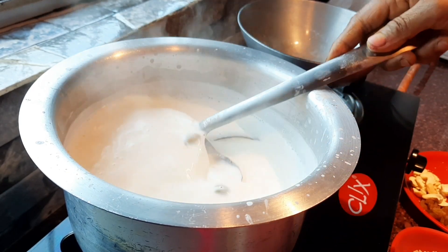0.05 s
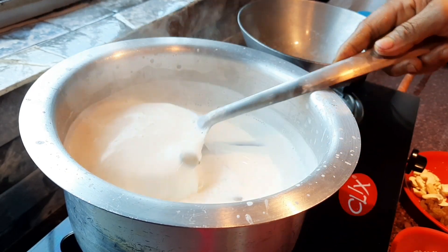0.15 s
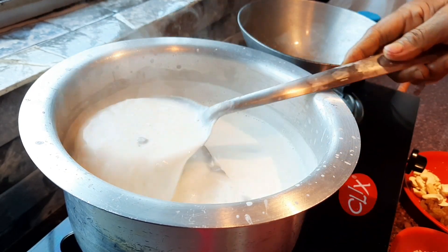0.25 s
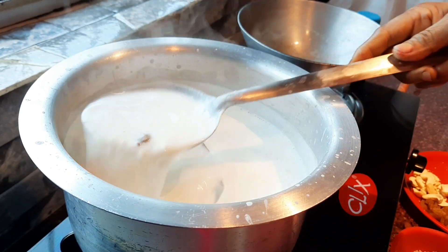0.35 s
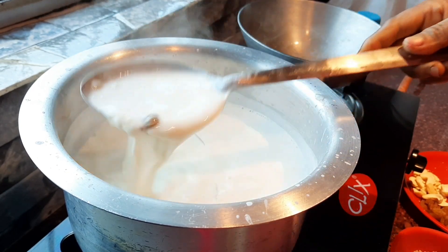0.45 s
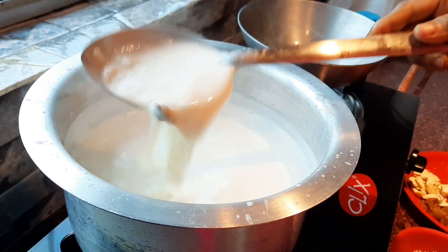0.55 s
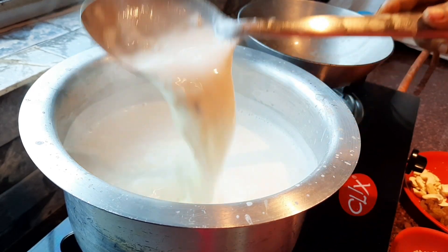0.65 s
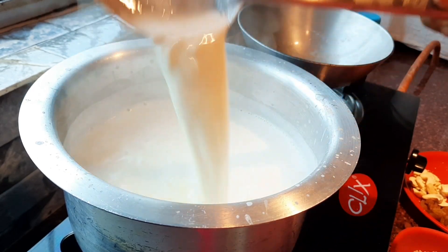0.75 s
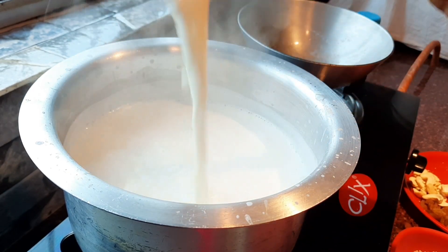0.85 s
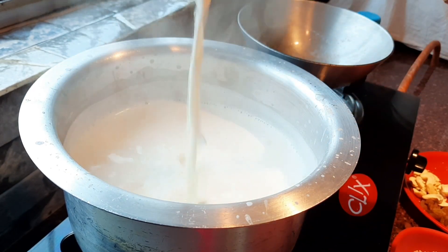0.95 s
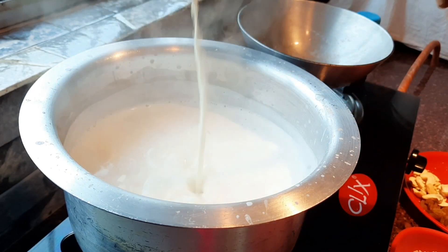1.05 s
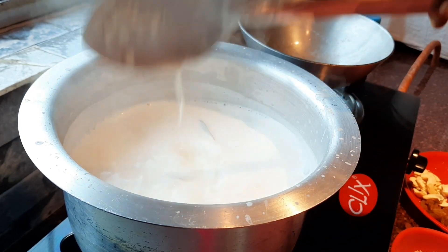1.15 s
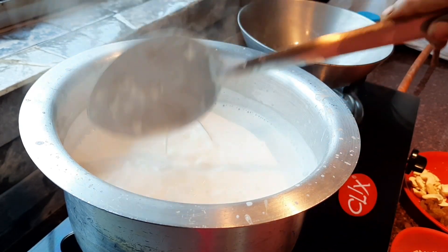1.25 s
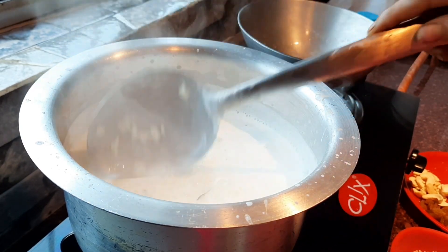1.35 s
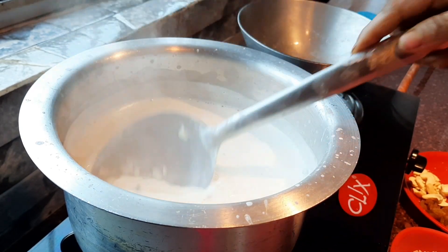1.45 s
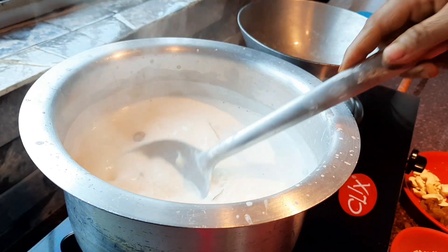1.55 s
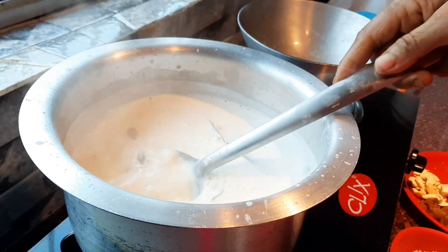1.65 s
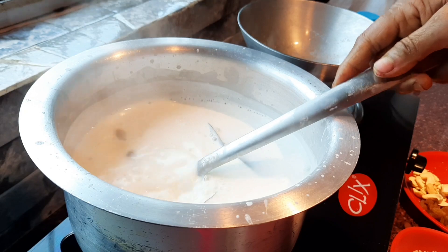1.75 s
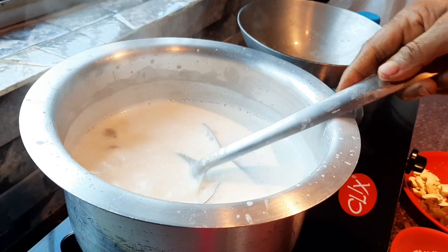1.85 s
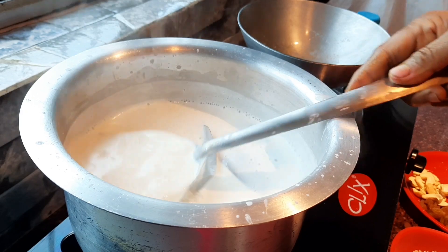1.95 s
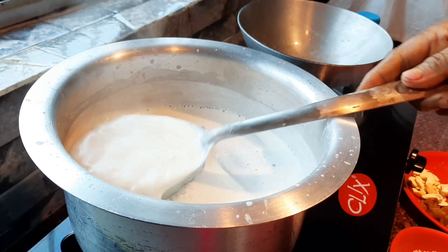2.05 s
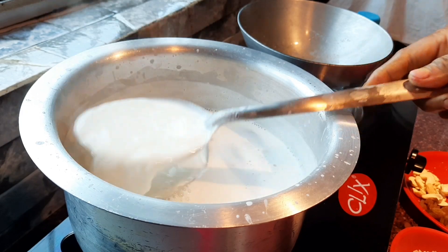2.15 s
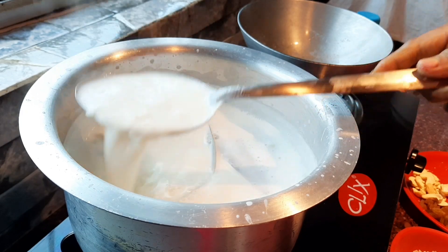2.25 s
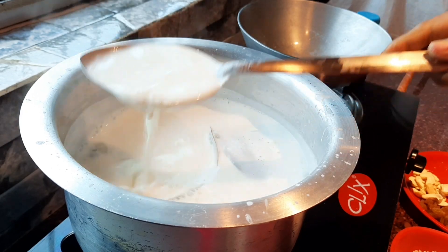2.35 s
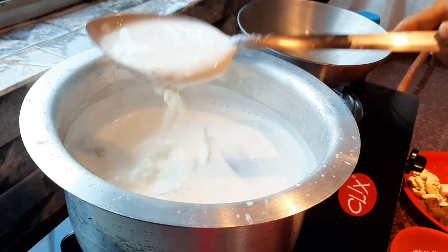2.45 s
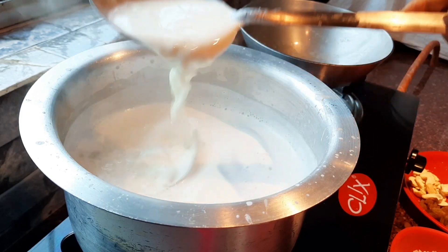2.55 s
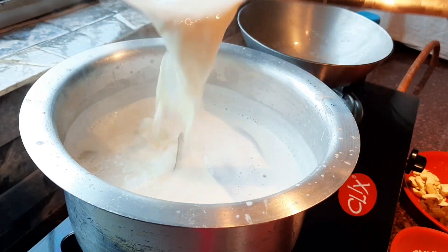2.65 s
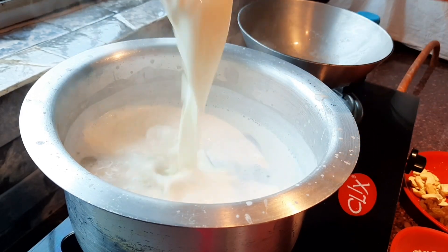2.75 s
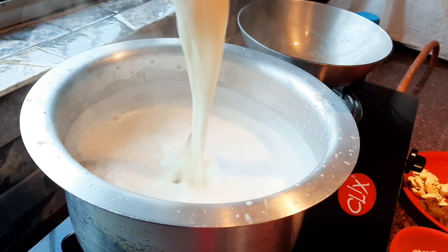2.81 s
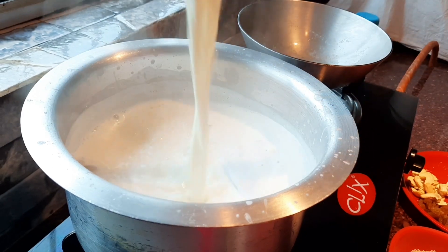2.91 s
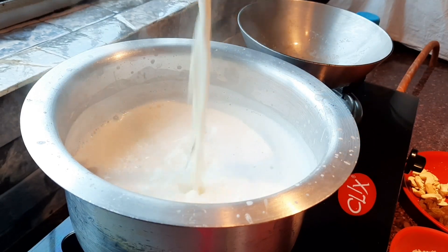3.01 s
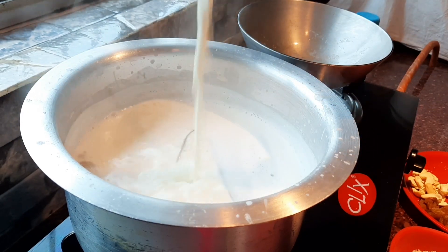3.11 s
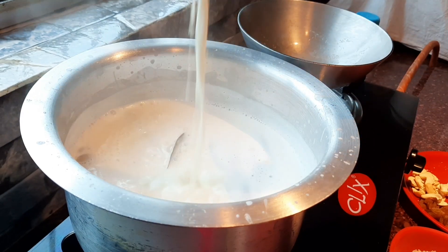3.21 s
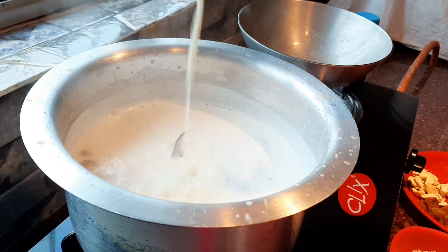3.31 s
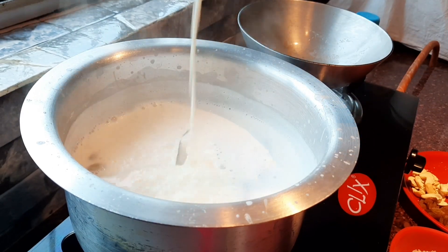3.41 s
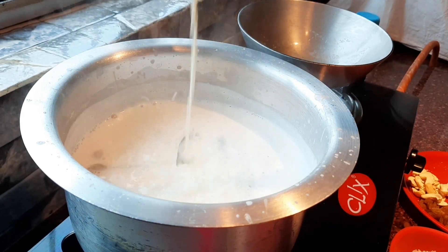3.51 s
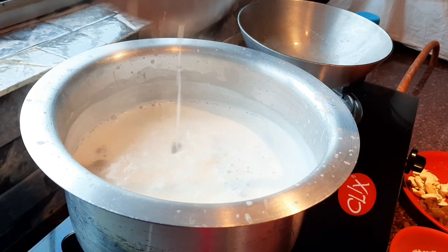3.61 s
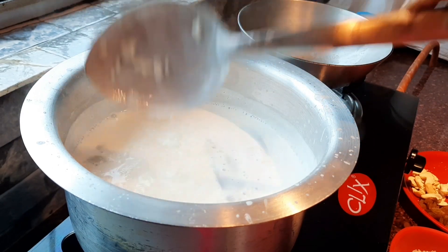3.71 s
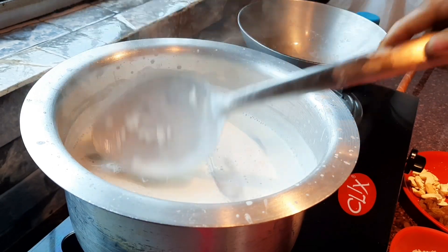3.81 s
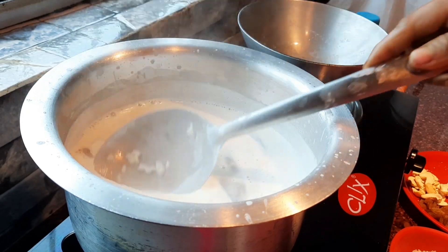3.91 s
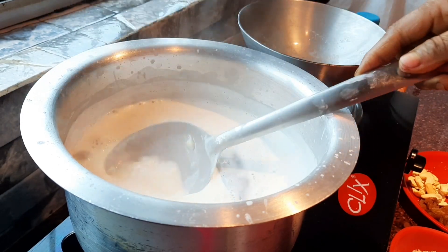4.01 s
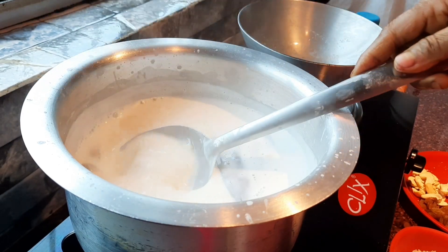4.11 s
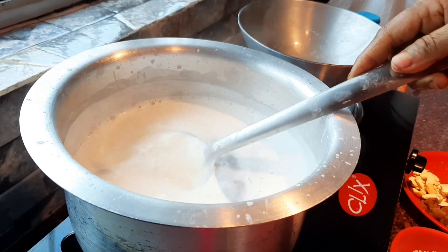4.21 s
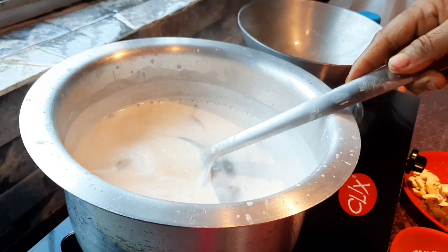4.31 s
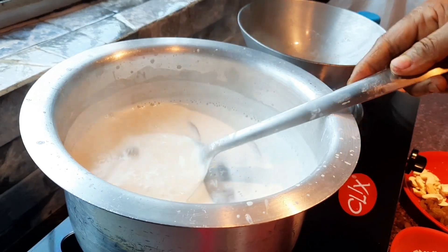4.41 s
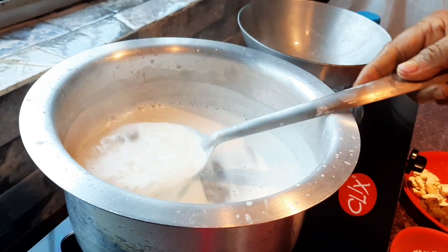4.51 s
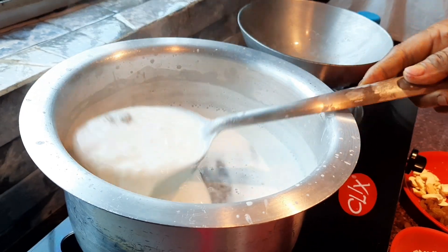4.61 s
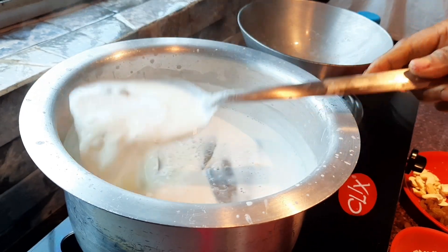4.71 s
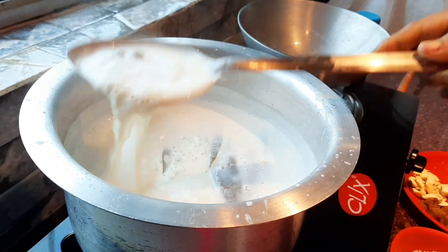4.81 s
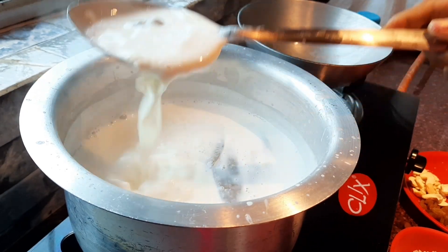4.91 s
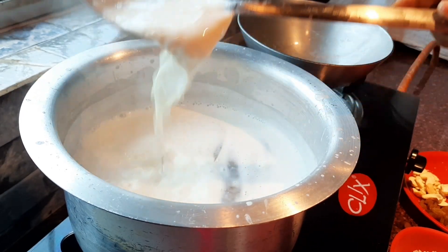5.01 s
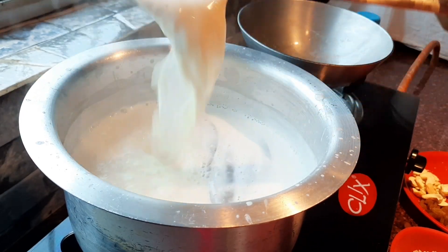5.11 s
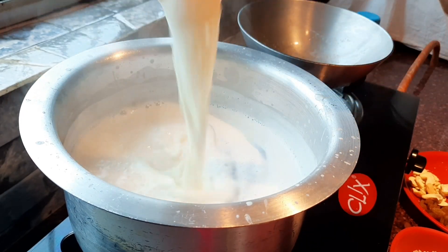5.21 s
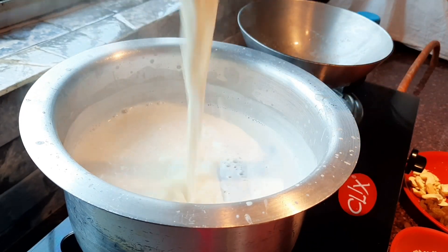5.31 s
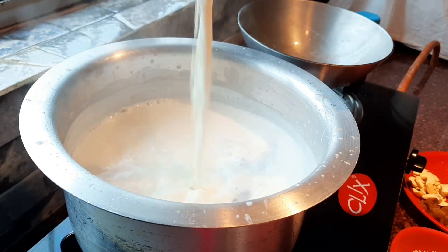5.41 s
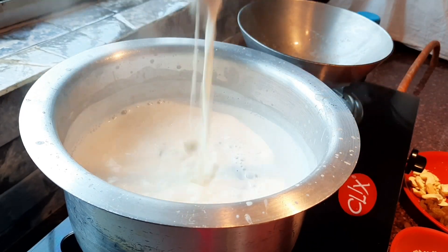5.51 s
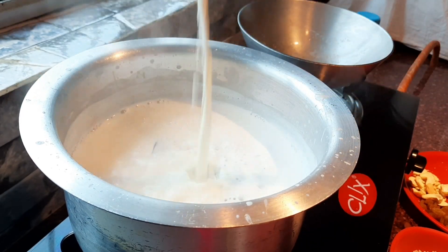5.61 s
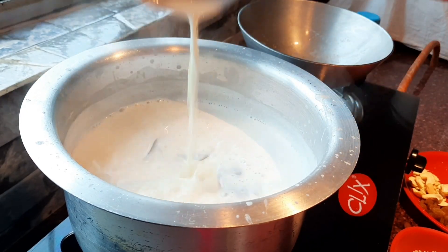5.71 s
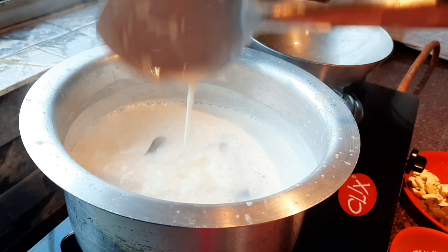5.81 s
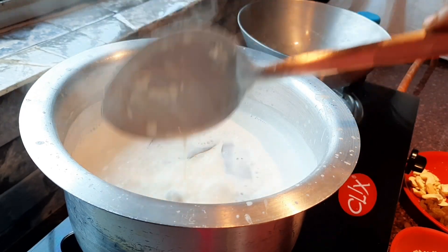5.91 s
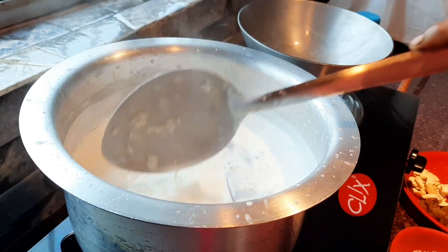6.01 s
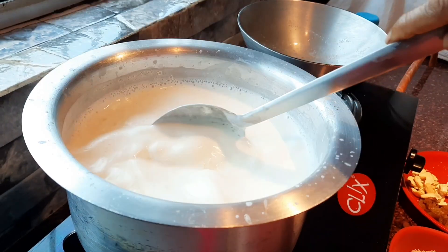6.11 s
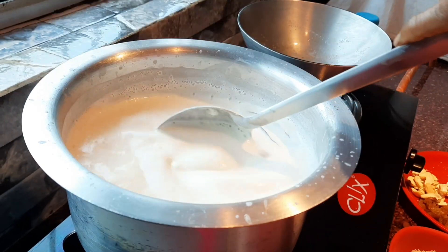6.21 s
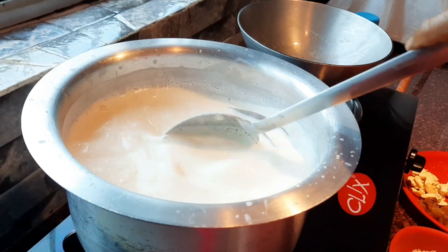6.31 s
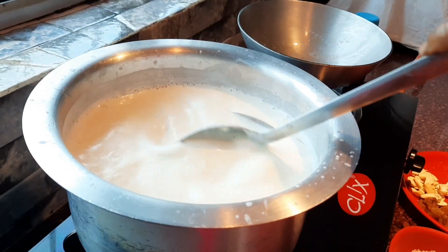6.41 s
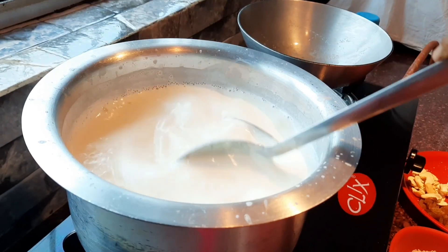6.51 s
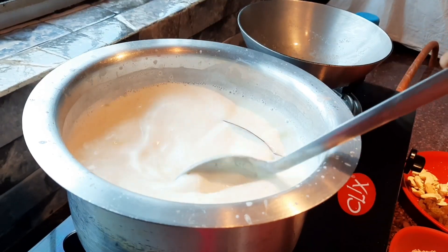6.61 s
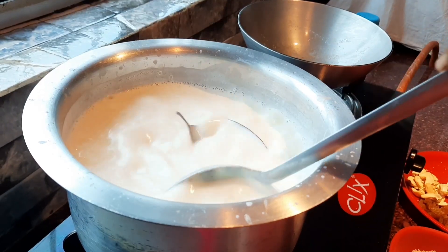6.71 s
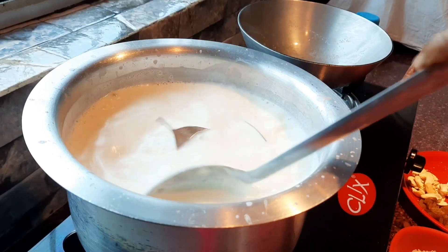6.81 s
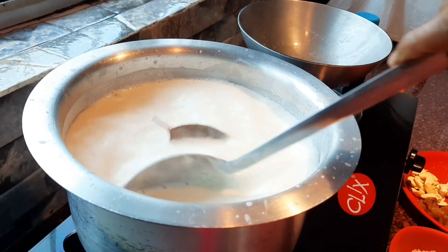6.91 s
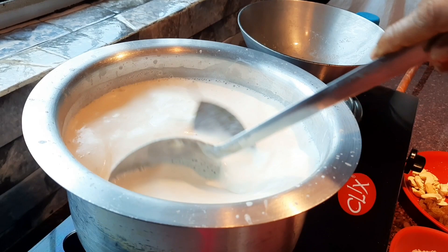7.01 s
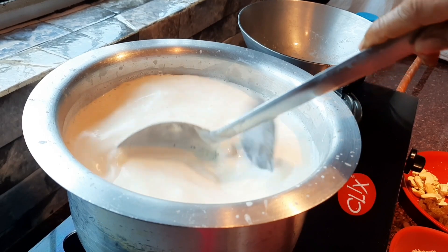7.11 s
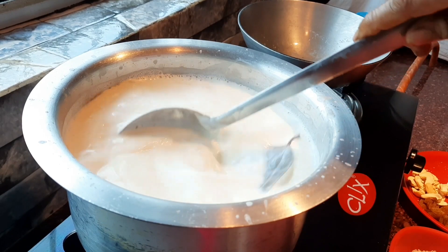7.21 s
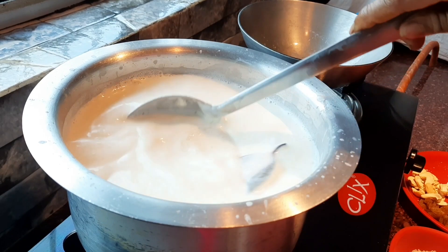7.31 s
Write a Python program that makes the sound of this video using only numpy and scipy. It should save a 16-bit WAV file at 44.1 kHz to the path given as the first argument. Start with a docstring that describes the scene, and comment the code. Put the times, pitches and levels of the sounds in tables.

```python
"""Small, quiet kitchen, close stereo microphone: a steel ladle scoops thick milk from an aluminium
pot three times and pours it back from a height. Pulses make the slapping, pattering stream, noise
its spray; damped modes make the clinks on the pot, rising tones the gulps under the surface.
Last the rim is scraped round the bottom: random small slips restart short rings."""
import sys
import numpy as np
from scipy import signal
from scipy.fft import rfft, irfft, next_fast_len
from scipy.io import wavfile
from scipy.ndimage import uniform_filter1d, map_coordinates

SR = 44100
rng = np.random.default_rng(int(sys.argv[2]) if len(sys.argv) > 2 else 0)


def unload_audio(sound):
    """Save the sound as a 16-bit wav file, at the path given as the first command line argument."""
    columns = np.transpose(np.atleast_2d(sound))
    # keep every value between -1 and 1, then stretch to whole-number steps
    steps = np.round(np.clip(columns, -1, 1) * 32767)
    wavfile.write(sys.argv[1], SR, steps.astype(np.int16))


N = 324135
T = np.arange(N) / SR
SHORT = T[:SR // 4]

# Levels in all tables are relative: mix gains follow.
# ladleful poured back: first_dribble_s, full_stream_s, spent_s, flow_db, spray_re_flow_db, plunge_re_flow_db
POURS = [(0.546, 0.712, 1.09, -49.5, -4, -2), (2.48, 2.795, 3.58, -44.5, -3.5, 1.5),
         (4.601, 5.285, 5.74, -43.5, -2, 0.5)]
# ladle modes: mode_hz, level_db, t60_s
LADLE_MODES = [(2620, -12.5, 0.14), (2903, -2, 0.079), (3320, -15, 0.055), (3270, -15, 0.061),
               (3470, -2, 0.02), (4170, -20, 0.072), (4840, -20, 0.035), (4780, -8, 0.031),
               (5320, -18, 0.071), (6740, -15, 0.072), (6830, -7.5, 0.044), (7700, -21.5, .07),
               (7930, -1, 0.1)]
# spray spectrum: freq_hz, level_db
SPRAY_SPECTRUM = [(900, -42), (1500, 5), (2000, -8.5), (2650, 5.5), (4000, 0), (5800, 0), (7400, 5.5),
                  (8600, -10), (11000, -6), (16000, -14.5)]
# grit spectrum: freq_hz, level_db
GRIT_SPECTRUM = [(600, -27), (1200, -14), (2200, 0), (3400, -9.5), (4600, -4), (6300, -11), (7500, -3),
                 (8600, -18.5), (11000, -11), (16000, -18.5)]


def amp(db):
    """Decibels to gain."""
    return 10 ** (np.asarray(db) / 20)


def unit(x):
    """Scale to rms 1."""
    return x / np.sqrt(np.mean(x ** 2) + 1e-20)


def along(points, hz):
    """Interpolate (Hz, value) points on a log frequency axis."""
    f, v = np.transpose(points)
    return np.interp(np.log(hz + 1), np.log(f + 1), v)


def since(s):
    """Seconds elapsed after time s; 0 before it."""
    return np.maximum(T - s, 0)


def until(s):
    """Seconds left before time s; 0 after it."""
    return np.maximum(s - T, 0)


def onward(s):
    """0 before time s, 1 after, with a ramp of 600 samples centred on s."""
    return uniform_filter1d(1. * (T >= s), size=600)


def wobble(rate_hz):
    """Smooth random curve, rate_hz knots a second."""
    knots = rng.standard_normal(int(N * rate_hz / SR) + 4)
    return map_coordinates(knots, [T * rate_hz])


def filtered(x, response):
    """Multiply the spectrum of x by a complex response of frequency."""
    n = x.shape[-1]
    m = next_fast_len(n + SR // 5)
    return irfft(rfft(x, m) * response(np.fft.rfftfreq(m, 1 / SR)), m)[..., :n]


def colour(x, spectrum):
    """Shape x by (Hz, dB) points."""
    return filtered(x, lambda hz: amp(along(spectrum, hz)))


def resonate(x, peaks):
    """Pass x through parallel second-order resonances (Hz, width Hz, dB)."""
    def response(f):
        return sum(amp(db) * 1j * f * w / (c * c - f * f + 1j * f * w) for c, w, db in peaks)
    return filtered(x, response)


def add(track, s, x):
    """Mix x into the track from time s."""
    part = track[..., max(round(s * SR), 0):][..., :x.shape[-1]]
    part += x[..., :part.shape[-1]]


def grains(rate_hz, spread_db):
    """Random single-sample impulses of uneven size and sign."""
    hits = rng.random(N) < rate_hz / SR
    size = amp(spread_db * np.clip(rng.standard_normal(N), -2, 2))
    return hits * size * rng.choice([-1, 1], N)


def pair(n):
    """Two noises as the microphones hear a diffuse field: alike in the bass."""
    # left-right likeness: freq_hz, correlation
    alike = [(100, 0.81), (600, 0.64), (1400, 0), (3000, 0.05), (16000, 0)]

    def mid_side(hz):
        turn = np.arccos(np.clip(along(alike, hz), -1, 1)) / 2
        return np.array([np.cos(turn), np.sin(turn)])
    mid, side = filtered(rng.standard_normal((2, n)), mid_side)
    return np.array([mid + side, mid - side])


def heard(x, pot_db, room_db, left_db, pot_t60_s=0.06, lead_s=0.00013):
    """Direct sound, reaching the left first, plus echoes inside the pot and from the kitchen."""
    # pot echo spectrum: freq_hz, level_db
    pot_air = [(60, -4.5), (170, -7.5), (235, 4), (290, -0.5), (480, -7.5), (620, 6.5), (790, -1.5),
               (930, 3), (1300, -10), (1600, 5.5), (3000, -5), (16000, 0)]
    # kitchen reverberation: freq_hz, t60_s
    kitchen = [(100, 0.46), (600, 0.28), (3000, 0.3), (14000, 0.29)]
    n = SR // 3
    t = T[:n]
    inside = colour(pair(n), pot_air) * amp(-60 * t / pot_t60_s) * (t > .0012)
    hz, at, z = signal.stft(pair(n), SR, nperseg=256)
    decay = amp(-60 * at / along(kitchen, hz)[:, None])
    room = signal.istft(z * decay, SR, nperseg=256)[1][:, :n] * (t > .006)
    echoes = (amp(pot_db) * unit(inside) + amp(room_db) * unit(room)) / np.sqrt(n)
    lag_s = lead_s * (1 + 0.36 * rng.uniform(-1.14, 1))  # each sound has its own spot in the pot
    direct = filtered(x, lambda f: np.array([np.ones(len(f)), np.exp(-2j * np.pi * f * lag_s)]))
    wet = signal.fftconvolve(x[None], echoes, axes=1)[:, :len(x)]
    return (direct + wet) * amp([[left_db / 2], [-left_db / 2]])


def slap(hz, delay_s):
    """One push of air between two sucks: a lump of liquid hitting the surface."""
    u = (np.pi * hz * (SHORT - delay_s)) ** 2
    return (1 - 2 * u) * np.exp(-u)


def burst(t60_s, delay_s=0):
    """A puff of noise that dies fast."""
    decay = amp(-60 * abs(SHORT - delay_s) / t60_s)
    return rng.standard_normal(len(SHORT)) * decay * (SHORT >= delay_s)


def ping(hz, cycles, rise, attack_s):
    """Damped tone, down 60 dB after some cycles of its first pitch, rising by the fraction rise."""
    age = SHORT * hz / cycles
    pitch_hz = hz * (1 + rise * np.minimum(age, 1))
    tone = np.sin(2 * np.pi * np.cumsum(pitch_hz) / SR)
    return tone * amp(-60 * age) * (1 - np.exp(-SHORT / attack_s))


def dull(hz, corner_hz):
    """Gain of a cushioned blow: steep loss above the corner."""
    return 1 / np.hypot(1, (hz / corner_hz) ** 3)


def ring(modes, corner_hz, scatter_db=1.5):
    """Struck modes at new strengths; a cushioned blow leaves out the high ones."""
    out = 0
    for hz, db, t60_s in modes:
        decay = amp(db + scatter_db * rng.normal() - 60 * SHORT / t60_s)
        out = out + decay * np.sin(2 * np.pi * hz * SHORT) * dull(hz, corner_hz)
    return out


def rubbed(hz, t60_s, rate_hz):
    """Each small slip restarts a short ring whose pitch may move; rms 1."""
    turn = np.exp(2j * np.pi * np.cumsum(hz * np.ones(N)) / SR)
    pole = amp(-60 / (abs(t60_s) * SR))
    slips = grains(rate_hz, spread_db=5.5)
    return unit((turn * signal.lfilter([1], [1, -pole], slips / turn)).real)


def fizz(count, low_hz, high_hz, cycles, spread_db):
    """Tiny bubbles bursting at random, each at its own pitch; rms 1."""
    when, place, size = rng.random((count, 3)).T[:, :, None]
    k = np.arange(256)
    turns = low_hz * (high_hz / low_hz) ** place * k / SR
    pops = amp(spread_db * size ** 3) * np.sin(2 * np.pi * turns) * amp(-60 * turns / cycles)
    return unit(np.bincount(((when * N).astype(int) + k).ravel(), pops.ravel(), N)[:N])


def background():
    """Faint room rumble and microphone hiss: steady shaped noise."""
    # background spectrum: freq_hz, level_db
    floor = [(25, -26), (55, -1), (90, -0.5), (160, -16.5), (230, -8), (350, -16.5), (520, -15),
             (1000, -21), (3000, -29), (5800, -31.5), (7400, -19.5), (8400, -41), (12000, -29),
             (16000, -29)]
    return amp(-66.0) * unit(colour(pair(N), floor))


def rocking():
    """The pot shifts once by itself on the hob with a soft, low rumble."""
    centre_s, half_s, level_db, pitch_hz = 1.465, 0.13, -59, 121
    swell = amp(level_db) * np.exp(-((T - centre_s) / half_s) ** 2)
    rumble = swell * rubbed(pitch_hz, t60_s=0.11, rate_hz=270)
    return heard(rumble, pot_db=-7, room_db=-8.5, left_db=2.5)


def clinks():
    """The ladle rings briefly; the filled pot answers with a dull knock and a low thud."""
    # ladle meets pot: start_s, level_db, brightness_corner_hz, wall_db, hob_thud_db
    blows = [(0.0, -40, 4270, -39.5, -45.5), (0.195, -50.5, 4020, -53.5, -49),
             (1.775, -31, 12100, -52, -43.5), (1.794, -52, 3500, -36.5, -52), (4.0009, -36, 2560, -45, -50),
             (4.043, -47, 2500, -38.5, -58), (6.235, -22, 5060, -24, -35.5), (6.288, -35, 3460, -37, -48),
             (7.313, -37, 6000, -39.5, -61)]
    # pot wall modes, damped by the milk: mode_hz, level_db, t60_s
    wall_modes = [(243, -16.5, 0.082), (613, -5, 0.089), (648, -11.5, .1), (1004, 1.5, 0.025),
                  (1197, -3.5, 0.054), (1330, -6, 0.067), (1810, -17, 0.11)]
    thud_hz = 104  # the heavy pot rocking on the hob
    out = np.zeros((2, N))
    for s, db, corner_hz, wall_db, thud_db in blows:
        noise = colour(burst(0.013) + amp(4.0) * burst(0.01), SPRAY_SPECTRUM)
        crack = filtered(noise, lambda hz: dull(hz, corner_hz))
        steel = amp(db) * (amp(-1.8) * ring(LADLE_MODES, corner_hz) + amp(0.5) * crack)
        knock = amp(wall_db - 4.5) * ring(wall_modes, 3000)
        thud = amp(thud_db) * ping(thud_hz, cycles=15.5, rise=0, attack_s=0.0014)
        add(out, s, heard(steel + knock, pot_db=2, room_db=-2.5, left_db=2.5))
        add(out, s, heard(thud, pot_db=-6, room_db=-8.5, left_db=2.0))
    return out


def dips():
    """Milk swirls around the moving bowl and gulps as trapped air pockets escape."""
    # bowl pushes through the milk: strongest_s, level_db, build_up_s, dying_away_s
    pushes = [(0.005, -44, 0.03, 0.45), (0.2, -58.5, 0.045, 0.49), (1.489, -76, 0.9, 1.8),
              (1.795, -40.5, 0.047, 0.28), (1.928, -58, 0.08, 0.63), (2.32, -52.5, 0.39, 0.38),
              (3.885, -57, 0.14, 0.4), (4.02, -38.5, 0.052, 0.32), (4.44, -66.5, 0.19, 1.5),
              (6.27, -58, 0.072, 3.5)]
    # air pockets at each push: delay_s, pitch_hz, level_re_push_db
    pockets = [(-0.005, 327, 1), (-0.002, 500, 3), (0.023, 450, -2.5)]
    # swirl spectrum: freq_hz, level_db
    slosh = [(25, -32), (60, -11), (105, -6.5), (150, -9.5), (330, -7.5), (700, -14.5), (1400, -20.5),
             (2200, -30), (7000, -40), (16000, -79)]
    range_db = 60.5  # level change over the build-up and dying-away times
    push = sum(amp(db - range_db * (until(s) / build_s + since(s) / die_s))
               for s, db, build_s, die_s in pushes)
    swirl = colour(grains(500, spread_db=2.5), slosh)
    out = push * unit(heard(swirl, pot_db=-3.5, room_db=-6.5, left_db=1.5))
    for s, db, *_ in pushes:
        for delay_s, hz, pocket_db in pockets:
            gulp = ping(hz * np.exp(0.02 * rng.normal()), cycles=34.0, rise=0.17, attack_s=0.0014)
            gulp = amp(db + pocket_db) * gulp
            add(out, s + delay_s, heard(gulp, pot_db=1.5, room_db=-1, left_db=-5.0))
    return out


def glide():
    """Light sliding over the bottom keeps the steel whispering and draws out single modes."""
    # light glides while scooping: start_s, length_s, level_db
    glides = [(-0.02, 0.24, -54.5), (1.788, 0.25, -53.5)]
    # one mode sings: centre_s, half_length_s, pitch_hz, level_db
    swells = [(0.046, 0.06, 2950, -60), (0.172, 0.056, 667, -64), (0.243, 0.04, 2640, -69),
              (1.801, 0.021, 5050, -56), (1.86, 0.075, 3350, -54), (2.014, 0.026, 2960, -57),
              (2.11, 0.08, 950, -63.5), (4.013, 0.025, 2920, -61), (4.053, 0.02, 1300, -46.5),
              (6.797, 0.079, 1497, -50.5), (6.903, 0.02, 1009, -45.5), (6.965, 0.042, 2924, -44.5),
              (6.997, 0.057, 5430, -50.5), (7.26, 0.063, 5410, -47.5), (7.309, 0.037, 2935, -44)]
    ease_db_per_s, lift_db_per_s = -20, -350  # pressure eases, then the rim lifts off
    peaks = [(hz, 170, db) for hz, db, _ in LADLE_MODES if hz < 7500]
    steel = unit(resonate(grains(1500, spread_db=9.5), peaks))
    grit = unit(colour(grains(1300, spread_db=5), GRIT_SPECTRUM))
    contact = sum(amp(db + ease_db_per_s * since(s) + lift_db_per_s * since(s + length_s)) * (T > s)
                  for s, length_s, db in glides)
    dry = contact * (amp(-4.5) * steel + amp(-30.0) * grit)
    for s, half_s, hz, db in swells:
        span = abs(T - s) < 2 * half_s
        t = T[span] - s
        # uneven friction blurs the pitch
        drift = np.cumsum(rng.standard_normal(len(t))) * np.sqrt(2 * np.pi * hz * 0.03 / SR)
        dry[span] += amp(db) * np.exp(-(t / half_s) ** 2) * np.sin(2 * np.pi * hz * t + drift)
    return heard(dry, pot_db=-0.5, room_db=-7.5, left_db=1.0)


def rubbed_modes(table, wander):
    """Modes shift and trade strength as the contact point travels; rms 1."""
    return unit(sum(amp(db + 2.6 * wobble(10)) * rubbed(hz * (1 + wander * wobble(6)), t60_s, rate_hz=1200)
                    for hz, db, t60_s in table))


def scrape():
    """The rim sticks and slips over the bottom: chatter, rubbed modes and grit follow the pressure."""
    # rim pressure on the bottom while stirring: time_s, pressure_db
    pressure = [(6.3, -49), (6.43, -44), (6.5, -38.5), (6.675, -40.5), (6.76, -61), (6.85, -52.5),
                (7.0, -48), (7.13, -53.5), (7.35, -47)]
    # rubbed modes of the pot bottom: mode_hz, level_db, t60_s
    bottom_modes = [(493, 1, 0.037), (269, -6.5, 0.024)]
    # rubbed modes of the blade: mode_hz, level_db, t60_s
    blade_modes = [(1430, 1, 0.011), (2008, -5.5, 0.011), (2700, -7.5, 0.034), (2963, -1.5, 0.071),
                   (3900, -13, .025), (4180, -5, 0.014), (5440, 1.5, 0.0072), (6630, -8, 0.022),
                   (7230, -5, 0.0063)]
    # rim catches and slips: start_s, level_db, pitch_hz
    catches = [(6.335, -18, 1140), (6.362, -12, 1160), (6.407, -17.5, 1080), (6.4553, -16, 1090),
               (6.4631, -14, 1080), (6.513, -19.5, 1040), (6.534, -16.5, 990), (6.5635, -9.5, 1140),
               (6.571, -16.5, 1220), (6.631, -25, 500), (6.678, -33.5, 268)]
    hard_from_s, hard_to_s, hard_db = 6.335, 6.675, -36.5  # the first, hard sweep chatters
    chatter_hz, rise_db_per_s, stop_db_per_s = 1042, 700, -480
    damped_above_db = -44  # harder pressure damps the modes as much as it drives them
    press_db = np.interp(T, *np.transpose(pressure))
    hard = amp(hard_db - rise_db_per_s * until(hard_from_s) + stop_db_per_s * since(hard_to_s))
    chatter = rubbed(chatter_hz * (1 + 0.04 * wobble(20)), t60_s=0.028, rate_hz=1000)
    chatter = (amp(-3.5) * hard + amp(press_db - 8)) * chatter
    bottom = amp(-2.0) * rubbed_modes(bottom_modes, wander=0.043)
    blade = amp(-2.1) * rubbed_modes(blade_modes, wander=0.0073)
    rubbing = amp(np.minimum(press_db, damped_above_db)) * (bottom + blade)
    rasp = grains(2000, spread_db=6.5) * amp(3.5 * wobble(90))
    grit = amp(press_db - 1.5) * unit(colour(rasp, GRIT_SPECTRUM))
    dry = (chatter + rubbing + grit) * onward(pressure[0][0])
    out = heard(dry, pot_db=-3.0, room_db=-4.5, left_db=1.5)
    for s, db, hz in catches:
        jerk = ping(hz, cycles=11.3, rise=0, attack_s=0.00049)
        jerk = jerk + amp(-10.5) * colour(burst(0.014), GRIT_SPECTRUM)
        add(out, s, heard(amp(db) * jerk, pot_db=0.5, room_db=-7.5, left_db=2.5))
    return out


def ticks():
    """Bursting froth and grit snap as noise puffs; a few small bubbles ring with rising pitch."""
    # sharp wet ticks and snaps of grit: start_s, level_db
    snaps = [(0.6767, -30), (1.1, -34.5), (1.1932, -36.5), (2.3466, -34), (2.6199, -40), (2.7477, -30),
             (3.2855, -29), (3.435, -29), (3.475, -27), (3.5481, -24.5), (3.59, -27.5), (4.5516, -30.5),
             (4.7066, -36.5), (5.66, -21.5), (5.438, -30), (6.628, -21.5), (6.6547, -15), (6.776, -20),
             (7.0041, -18.5), (7.0384, -29)]
    # ringing bubbles: start_s, first_pitch_hz, level_db
    bubbles = [(2.952, 6700, -27), (3.119, 1560, -36.5), (3.576, 3280, -33.5), (3.648, 4120, -37.5),
               (5.6432, 2536, -20), (5.6443, 3350, -20.5), (5.706, 7900, -27.5)]
    spectrum = [(1500, -39), (4500, -8.0), (8000, -4.5), (12000, -3.0), (16000, -6.5)]  # Hz, dB
    out = np.zeros((2, N))
    for s, db in snaps:
        noise = burst(0.0031, delay_s=.0015) + amp(-18.0) * burst(0.036, delay_s=0.0013)
        snap = amp(db + 5.5) * colour(noise, spectrum)
        add(out, s, heard(snap, pot_db=-0.5, room_db=-4, left_db=2.0))
    for s, hz, db in bubbles:
        bubble = amp(db) * ping(hz, cycles=48.2, rise=0.45, attack_s=0.000067)
        add(out, s, heard(bubble, pot_db=1.0, room_db=-4.0, left_db=-2.0))
    return out


def splats():
    """Each lump of milk slaps the surface, opens a low cavity and throws fine spray."""
    # lumps hitting the surface: start_s, level_db, slap_pitch_hz, spray_re_slap_db
    lumps = [(0.328, -53.5, 650, -14), (0.562, -43.5, 640, -9.5), (0.589, -37.5, 605, -8.5),
             (0.627, -34, 623, -6), (0.674, -25, 856, -15), (0.697, -27, 1000, -30),
             (0.722, -28, 700, -7.5), (0.735, -23.5, 930, -14), (0.841, -37.5, 598, -32),
             (0.891, -30.5, 590, -26), (0.963, -23.5, 584, -22), (1.019, -32, 695, -11.5),
             (1.125, -42, 641, -9), (1.19, -28.5, 665, -21.5), (1.814, -29, 550, -14.5),
             (2.263, -46, 616, -12), (2.294, -38, 644, -17), (2.306, -36, 553, -15.5),
             (2.334, -32.5, 680, -18.5), (2.489, -34, 640, -23), (2.539, -31.5, 654, -20.5),
             (2.616, -28.5, 729, -9), (2.671, -26, 740, -6.5), (2.722, -27.5, 668, -20),
             (2.801, -21, 616, -14), (2.902, -31, 506, -5), (2.962, -26.5, 659, -14.5),
             (2.995, -30.5, 650, -13), (3.06, -23, 610, -17), (3.115, -28, 590, -34),
             (3.206, -31.5, 670, -4), (3.312, -28.5, 732, -15), (3.351, -32, 586, -1.5),
             (3.404, -24, 660, -10), (3.446, -25, 656, -8.5), (3.504, -23.5, 575, -25),
             (4.802, -42, 830, -16), (4.841, -39.5, 850, -8), (4.945, -36.5, 656, -8.5),
             (5.121, -32, 675, 0), (5.264, -22.5, 597, -9.5), (5.351, -22, 590, -13), (5.382, -28, 310, -9),
             (5.407, -26.5, 710, -13.5), (5.451, -25.5, 560, -13), (5.466, -24, 600, -30),
             (5.566, -20.5, 870, -9), (5.595, -26.5, 620, -9.5), (5.659, -20.5, 600, -6.5),
             (5.702, -29.5, 646, -8.5), (5.765, -30, 613, -11), (5.792, -34.5, 581, -24),
             (5.814, -31, 620, -25), (6.117, -55, 646, -2)]
    # the cavity grows as the full stream digs into the milk
    shallow_db, deep_db, dig_s = -22.5, -15.5, 0.22
    out = np.zeros((2, N))
    for s, db, hz, spray_db in lumps:
        _, full_s, *_, plunge_db = min(POURS, key=lambda pour: abs(pour[1] - s))
        cavity_db = plunge_db + np.interp(s - full_s, [0, dig_s], [shallow_db, deep_db])
        body = slap(hz, delay_s=0.00293) + amp(cavity_db) * slap(258, delay_s=0.0037)
        noise = amp(4.5) * burst(0.0021, delay_s=0.003) + amp(-6.5) * burst(0.046, delay_s=.0028)
        spray = amp(spray_db + 8.5) * colour(noise, SPRAY_SPECTRUM)
        add(out, s, heard(amp(db - 1.27) * (body + spray), pot_db=0.5, room_db=-4, left_db=1.0))
    return out


def pouring():
    """Gains of patter, plunge and spray: each pour starts weak, swells, thins and stops."""
    dribble_db, thin_db_per_s, stop_db_per_s = -26.5, -9.5, -125
    # extra spray until froth cushions the stream, and what is left then
    fresh_db, cushion_s, left_over_db = 7, 0.071, -5.5
    patter, plunge, spray = np.zeros((3, N))
    for start_s, full_s, spent_s, db, spray_db, plunge_db in POURS:
        swell_db = dribble_db * until(full_s) / (full_s - start_s)
        fall_db = thin_db_per_s * since(full_s) + stop_db_per_s * since(spent_s)
        flow = amp(db + swell_db + fall_db) * onward(start_s)
        patter += flow
        # weak until the full stream lands
        plunge += flow * amp(plunge_db - 3.5 * np.exp(-since(full_s) / 0.035))
        spray += flow * amp(spray_db + left_over_db + fresh_db * np.exp(-since(full_s) / cushion_s))
    return patter, plunge, spray


def drops(table):
    """Random slaps at each (Hz, dB) pitch, each pitch scaled to its level."""
    out = 0
    for hz, db in table:
        hits = signal.fftconvolve(grains(190, spread_db=8.0), slap(hz, delay_s=0.00399))[:N]
        out = out + amp(db) * unit(hits)
    return out


def stream():
    """The thread of milk patters on the surface and plunges under it while froth crackles."""
    # patter pitches: pitch_hz, level_db
    patter_pitches = [(640, -2.5), (1000, -7.5), (1700, -13)]
    # cavities dug by the stream: pitch_hz, level_db
    plunge_pitches = [(90, -18), (310, -9)]
    # bursting froth spectrum: freq_hz, level_db
    froth_spectrum = [(2000, -9), (5500, 1), (7300, -3), (8600, -3), (14000, 2)]
    patter_gain, plunge_gain, spray_gain = pouring()
    surge = amp(2.25 * wobble(45))  # the thread thickens and thins
    liquid = patter_gain * drops(patter_pitches) + plunge_gain * drops(plunge_pitches)
    spray = unit(colour(grains(600, spread_db=6.5), SPRAY_SPECTRUM))
    bubbles = fizz(count=3200, low_hz=1980, high_hz=14900, cycles=14.6, spread_db=27.5)
    froth = unit(colour(bubbles, froth_spectrum))
    dry = surge * (amp(-4) * liquid + spray_gain * (amp(-3.5) * spray + amp(-3.0) * froth))
    return heard(dry, pot_db=2.5, room_db=-9.0, left_db=1.0)


def scene():
    """Everything that happens at the pot, over the quiet of the kitchen."""
    scraping = glide() + scrape()
    milk = dips() + ticks() + splats() + stream()
    return background() + rocking() + clinks() + scraping + milk


def record(dry):
    """The recorder sheds deep rumble and keeps almost nothing above its band limit."""
    top_hz = 16100
    lean = signal.sosfilt(signal.butter(2, 45, "highpass", fs=SR, output="sos"), dry)
    return filtered(lean, lambda hz: 1 / np.hypot(1, (hz / top_hz) ** 80))


dry = scene()
out = record(dry)
unload_audio(out)
```